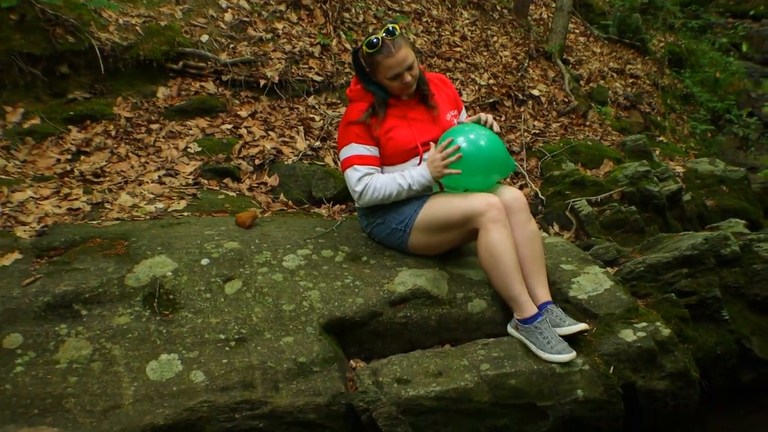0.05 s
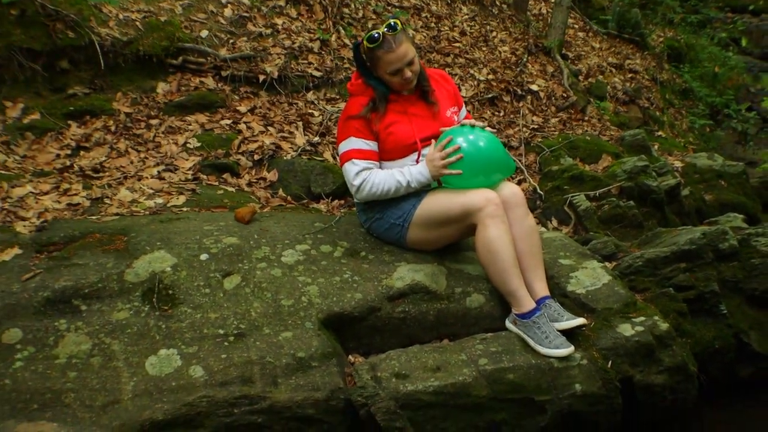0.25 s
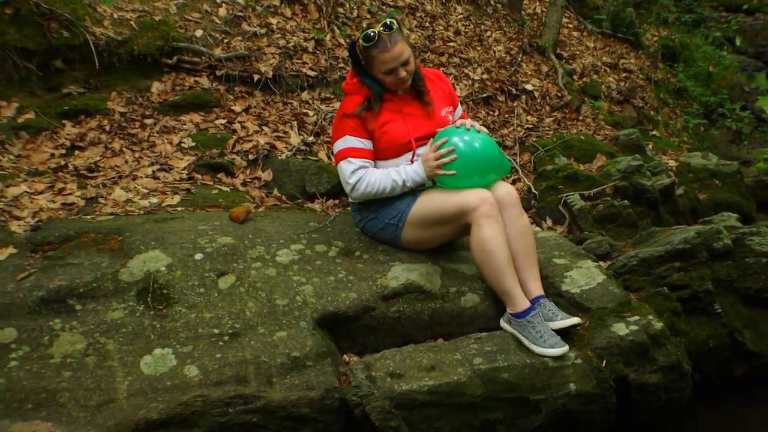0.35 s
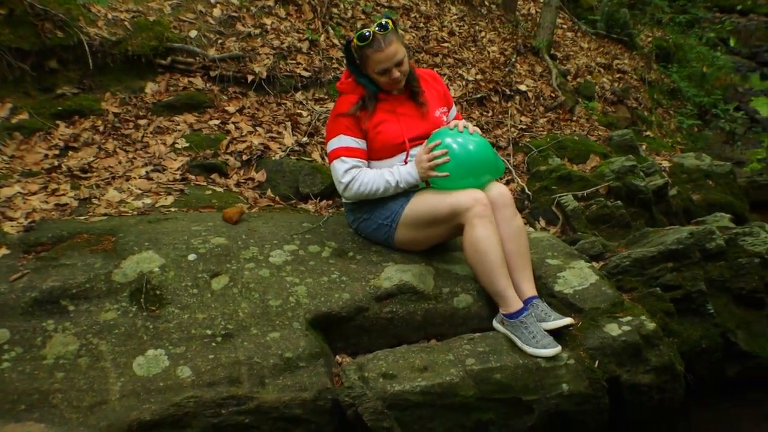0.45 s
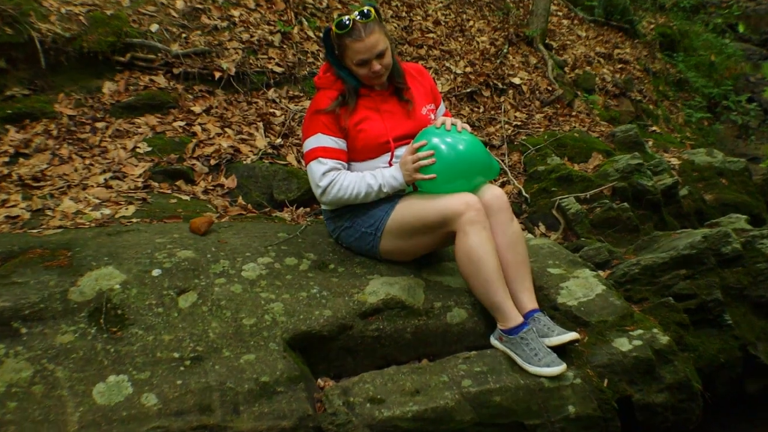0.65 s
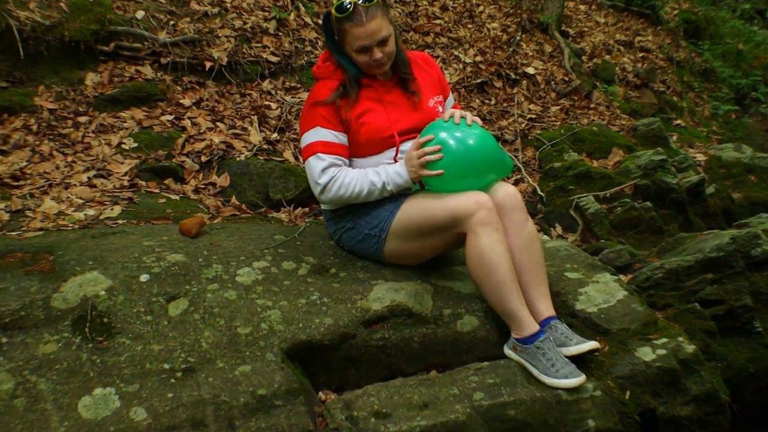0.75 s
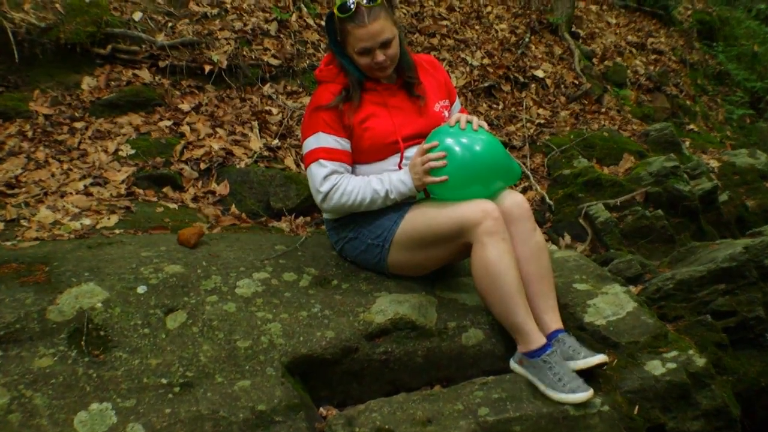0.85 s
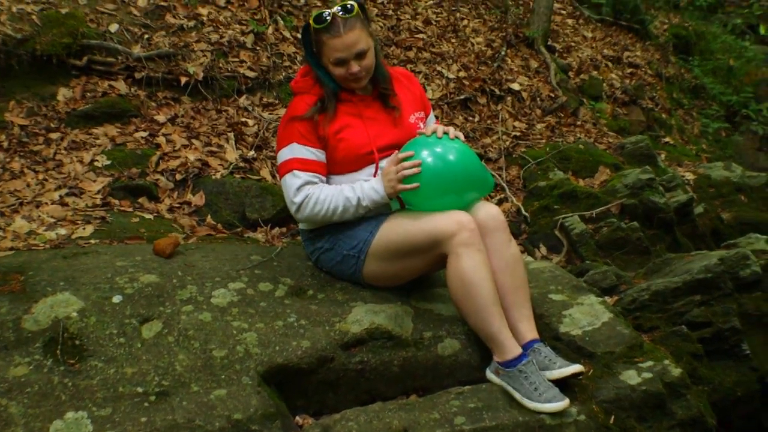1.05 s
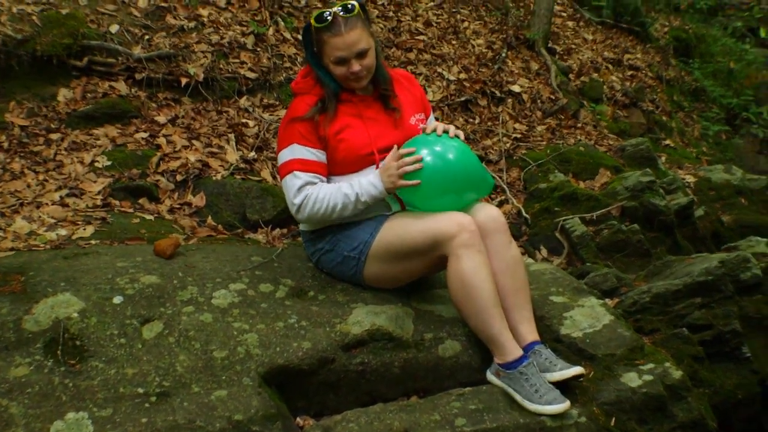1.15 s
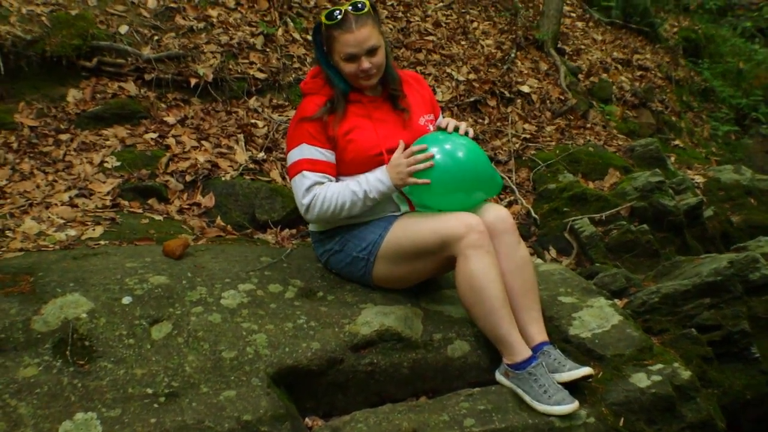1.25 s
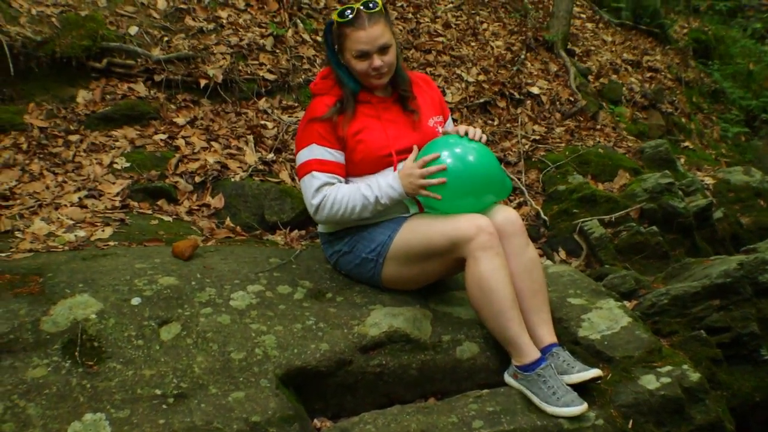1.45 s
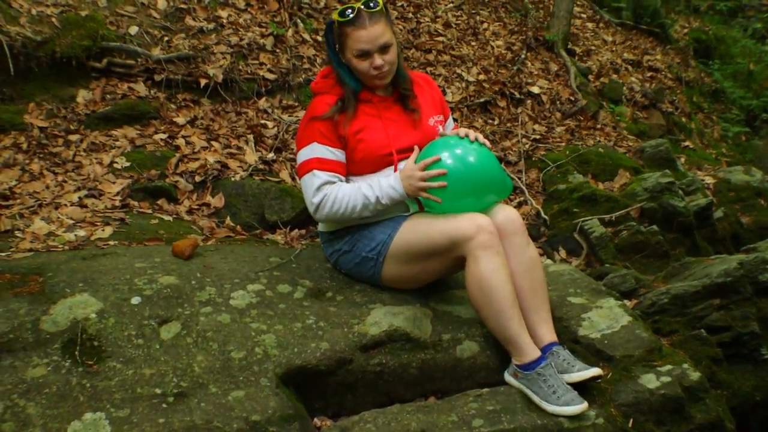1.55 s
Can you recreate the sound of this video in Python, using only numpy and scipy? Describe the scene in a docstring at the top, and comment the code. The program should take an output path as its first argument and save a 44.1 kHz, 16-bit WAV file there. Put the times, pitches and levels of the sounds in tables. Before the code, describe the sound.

Hands rub an inflated balloon, making short rubbery squeaks, creaks and crackles.

```python
"""Hands rub an inflated balloon in a quiet wood.
Fingertips stick and slip on the tight rubber: single slips crack, fast runs of slips become squeaks,
and light sliding hisses. All this rubbing rings in the balloon's skin and the air inside it.
Now and then a hand bumps the balloon. A low outdoor rumble and a faint hiss lie beneath."""
import sys
import numpy as np
from scipy import signal
from scipy.fft import rfft, irfft
from scipy.io import wavfile

SR = 44100
rng = np.random.default_rng(int(sys.argv[2]) if len(sys.argv) > 2 else 0)


def dump(signal):
    """Clip the signal to [-1, 1] and save it as 16-bit WAV at the path in sys.argv[1]."""
    limited = np.clip(np.atleast_2d(signal).T, -1, 1)
    pcm = np.round(limited * 32767).astype(np.int16)
    wavfile.write(sys.argv[1], SR, pcm)


N = 70560
TIME = np.arange(N) / SR
SIZE = 2 * N   # double length leaves room for ringing when filtering
HZ = np.maximum(np.arange(N + 1) * SR / SIZE, 1)


def from_db(db):
    """Turn decibels into a gain."""
    return 10 ** (np.asarray(db) / 20)


def unit_power(x):
    """Scale a signal to an average power of 1."""
    return x / np.sqrt(np.mean(x ** 2) + 1e-20)


def in_time(rows):
    """Join rows that start with a time into one curve for each other column."""
    seconds, *columns = np.transpose(rows)
    return [np.interp(TIME, seconds, column) for column in columns]


def at_hz(rows):
    """Join rows of frequency and value into a curve over all frequencies."""
    hz, value = np.transpose(rows)
    return np.interp(np.log(HZ), np.log(hz), value)


def pan(db):
    """Left and right gains, with the left louder by db."""
    return from_db(np.array([[1], [-1]]) * db / 2)


def tone_filter(rows):
    """A filter of power 1 with the given tone; it never rings before a sound starts (minimum phase)."""
    gain = unit_power(from_db(at_hz(rows)))
    cepstrum = irfft(np.log(gain))
    cepstrum[1:N] *= 2
    cepstrum[N + 1:] = 0
    return np.exp(rfft(cepstrum))


def through(x, response):
    """Pass a sound through a filter."""
    return irfft(rfft(x, SIZE) * response)[..., :N]


def drift(rate_hz):
    """A smooth random wobble, about 1 in size."""
    pole = np.exp(-2 * np.pi * rate_hz / SR)
    return unit_power(signal.lfilter([1], [1, -2 * pole, pole * pole], rng.standard_normal(SIZE))[N:])


def stereo(mid, side, alike):
    """Mix two unrelated signals into left and right; alike runs from 0 (unrelated) to 1 (the same)."""
    alike = np.clip(alike, -1, 1)
    return (np.sqrt(1 + alike) * mid + np.sqrt(1 - alike) * side * np.array([[1], [-1]])) / np.sqrt(2)


# How the rumble swells and fades. Each row: time in seconds, level in dB.
RUMBLE_LEVELS = [(0, -41), (0.3, -40), (0.6, -41.5), (0.7, -47.5), (0.85, -39.5), (1.0, -50.5), (1.2, -53),
                 (1.5, -50.5), (1.6, -43.5)]
# The tones of the rumble and the hiss. Each row: frequency in Hz, relative level in dB.
RUMBLE_TONE = [(20, -39), (40, -1.5), (60, 1), (140, 2), (220, -7.5), (400, -10), (1000, -28), (4000, -63)]
HISS_TONE = [(60, -12), (300, 0.5), (600, -0.5), (1000, 0), (3000, -3), (10000, -9), (13000, -30),
             (16000, -69)]

def woods(rumble_alike=.97, hiss_alike=0.2, hiss_db=-45):
    """The outdoors: a low rumble and a faint, even hiss."""
    rumble_db, = in_time(RUMBLE_LEVELS)
    rumble = through(stereo(*rng.standard_normal((2, N)), rumble_alike), tone_filter(RUMBLE_TONE))
    hiss = through(stereo(*rng.standard_normal((2, N)), hiss_alike), tone_filter(HISS_TONE))
    return from_db(rumble_db) * rumble + from_db(hiss_db) * hiss


# Soft bumps of the hand. Each row: start in seconds, pitch in Hz, level in dB, seconds to fade by 60 dB.
HAND_BUMPS = [(0.170, 427, -24.5, 0.014), (0.283, 69.6, -37, .14), (1.0012, 233, -9, 0.012),
              (1.003, 80, -22.5, 0.057), (1.097, 221.6, -20, 0.17)]

def bumps(low_cut_hz=55):
    """The whole balloon wobbles briefly when a hand nudges it."""
    wobbles = np.zeros(N)
    for start_s, hz, db, fade_s in HAND_BUMPS:
        age = np.maximum(TIME - start_s, 0)
        wobbles -= from_db(db - 60 * age / fade_s) * np.sin(2 * np.pi * hz * age)
    return signal.sosfilt(signal.butter(2, low_cut_hz, "high", fs=SR, output="sos"), wobbles)


# How alike the ringing is on the left and right. Each row: frequency in Hz, likeness from 0 to 1.
RING_LIKENESS = [(100, 0.91), (300, 0.52), (1000, 0.2), (2200, 0.19), (4000, 0.14), (8000, 0.3)]

def ringing(fade_s):
    """A stereo filter for a crowd of resonances that die away by 60 dB in fade_s seconds."""
    tail = rng.standard_normal((2, N)) * from_db(-60 * TIME / fade_s)
    mid, side = rfft(tail / np.sqrt(np.sum(tail ** 2, axis=1, keepdims=True)), SIZE)
    return stereo(mid, side, at_hz(RING_LIKENESS))


# How far the direct sound lags on the left. Each row: frequency in Hz, phase lag in radians.
DIRECT_LAG = [(200, 0.066), (1700, 0.16), (3000, 0.63), (4800, 1.79), (7000, 1.17), (12000, 1.12)]

def balloon_spot(skin_db=-3, skin_from_hz=700, air_db=-5, air_damp_hz=9700):
    """A filter for one spot on the balloon: direct sound, waves round the skin and ringing air."""
    skin_gain, air_gain = from_db(skin_db), from_db(air_db)
    skin = skin_gain * ringing(fade_s=.015) * (1j * HZ / (skin_from_hz + 1j * HZ))   # less bass
    air = air_gain * ringing(fade_s=.12) / (1 + 1j * HZ / air_damp_hz)   # less treble
    direct = np.exp(-1j * at_hz(DIRECT_LAG) * np.array([[1], [0]]))
    return (direct + skin + air) / np.sqrt(1 + skin_gain ** 2 + air_gain ** 2)


# The notes the balloon rings at. Each row: frequency in Hz, dB above the direct sound,
# seconds to fade by 60 dB.
RESONANCES = [(222.5, -2, 0.16), (297, 1.5, 0.074), (472.5, 0.5, 0.032), (571, -2.5, 0.064),
              (645, -4.5, 0.038), (727, -9, 0.064), (1153, -3, 0.013), (1760, -1.5, 0.031),
              (1950, -5, 0.093), (2416, 0.5, 0.017), (2660, -4, 0.032), (3490, -2, 0.021),
              (3790, -9, 0.024)]
# Which side is louder. Each row: frequency in Hz, dB by which the left is above the right.
SIDE_BALANCE = [(200, -1.5), (600, 0), (1300, -3), (2500, -.5), (4300, 5.5), (8000, 1), (12000, -0.5)]

def resonate(rubbing):
    """The balloon's main resonances colour every rub; the sound spreads unevenly to left and right."""
    peaks = sum(from_db(db) / (1 + 1j * (HZ - hz) * (2 * np.pi * fade_s / np.log(1000)))
                for hz, db, fade_s in RESONANCES)
    return through(rubbing, pan(at_hz(SIDE_BALANCE)) * (1 + peaks))


# Light sliding of the palm. Each row: time in seconds, level in dB.
SLIDE_LEVELS = [(0.0, -28), (0.03, -43.5), (0.08, -49.5), (0.155, -46.5), (0.2, -49), (0.265, -35.5),
                (0.32, -33), (0.385, -38.5), (0.41, -53), (0.46, -54), (0.478, -37), (0.505, -34.5),
                (0.52, -46.5), (0.58, -36), (0.62, -55), (0.70, -40.5), (0.76, -37.5), (0.805, -38.5),
                (0.87, -33.5), (0.925, -42), (1.05, -42.5), (1.12, -34.5), (1.3, -46), (1.395, -47),
                (1.47, -49), (1.53, -50), (1.555, -41), (1.578, -52), (1.6, -62)]
# Its tone. Each row: frequency in Hz, relative level in dB.
SLIDE_TONE = [(100, -14.5), (300, 5.5), (420, 1), (640, 8), (950, -2), (2000, -1.5), (3600, -0.5),
              (5500, -1.5), (6800, 3), (8500, -5), (10800, -3.5), (13000, -20), (16000, -57)]

def slide(grain_db=4.0, flutter_db=2, flutter_hz=110):
    """The palm skims the rubber in countless tiny catches, which blur into a hiss."""
    db, = in_time(SLIDE_LEVELS)
    catches = rng.standard_normal(N)
    catches *= from_db(grain_db * rng.standard_normal(N) + flutter_db * drift(flutter_hz))
    return through(unit_power(catches) * from_db(db), tone_filter(SLIDE_TONE) * balloon_spot())


def squeak(run, tone, jitter, jitter_hz, uneven_db, scrape_db, left_db, smear_s=0.001207):
    """A finger sticks and slips in a fast, unsteady run: each slip snaps, then scrapes a little."""
    rate, db = in_time(run)
    slip_count = np.cumsum(rate * np.exp(jitter * drift(jitter_hz))) / SR
    new_slip = np.diff(np.floor(slip_count), prepend=0)
    snaps = new_slip * np.sqrt(SR / rate) - np.sqrt(rate / SR)   # centred on zero
    scrape = from_db(scrape_db) * unit_power(rng.standard_normal(N) * np.exp(-(slip_count % 1)))
    force = unit_power((snaps + scrape) * from_db(uneven_db * drift(rate_hz=300)))
    touching = (TIME > run[0][0]) & (TIME < run[-1][0])
    smear = np.exp(-2j * np.pi * smear_s * HZ * (1 - HZ / SR))   # rubber spreads each snap, treble first
    response = tone_filter(tone) * smear * balloon_spot()
    return pan(left_db) * through(force * from_db(db) * touching, response)


# Five runs of slips. Each row: time in seconds, slips per second (the pitch), level in dB.
CHIRP_RUN = [(0.203, 480, -33), (0.212, 487, -26), (0.229, 623, -12.5), (0.238, 793, -17.5),
             (0.249, 785, -12), (0.259, 805, -21.5), (0.266, 800, -57), (0.280, 630, -61)]
CREAK_RUN = [(1.129, 195, -23), (1.135, 195, -17.5), (1.152, 206, -19), (1.168, 310, -21), (1.18, 380, -19),
             (1.195, 380, -36), (1.215, 490, -33)]
SQUEAL_RUN = [(1.185, 850, -22), (1.204, 890, -19.5), (1.222, 920, -18.5), (1.24, 940, -19.5),
              (1.26, 890, -23.5), (1.28, 880, -28)]
RASP_RUN = [(1.245, 830, -24), (1.27, 830, -23.5), (1.30, 810, -21), (1.325, 570, -23.5), (1.335, 600, -38)]
SCRATCH_RUN = [(1.334, 424, -43), (1.35, 430, -34.5), (1.368, 410, -30), (1.382, 540, -42),
               (1.40, 450, -52)]
# The tone of each run. Each row: frequency in Hz, relative level in dB.
CHIRP_TONE = [(200, -12.5), (480, -5.5), (790, 1), (1100, -11.5), (1750, -12), (2350, -6), (3700, -0.5),
              (4800, -2), (6400, 1.5), (8500, -11), (11000, -18), (13500, -39), (16000, -72)]
CREAK_TONE = [(120, -18), (220, -3.5), (400, -12), (630, -4), (1000, -11), (2000, -2.5), (2400, -3),
              (2900, -8), (3600, -2), (5000, 4.5), (6500, 3), (9000, -7), (11000, -16.5), (13000, -22),
              (16000, -45)]
SQUEAL_TONE = [(150, -18), (500, -14.5), (900, -8.5), (1300, -12), (1800, 1.5), (2200, -6), (2700, -3),
               (3300, -1.5), (4200, 0.5), (5300, 2), (7000, 0.5), (10500, -3), (13000, -43), (16000, -54)]
RASP_TONE = [(150, -21), (400, -10.5), (650, -4), (1000, -11.5), (1800, -2), (2100, -11), (2450, -1.5),
             (2900, -4), (3800, 6), (5000, 2), (8000, -1.5), (10500, -5), (13000, -37), (16000, -55)]
SCRATCH_TONE = [(150, -5), (650, -5), (1200, 3), (2000, -1), (4200, 7.5), (6500, -2), (10500, -6),
                (13000, -27), (16000, -45)]

def squeaks():
    """A short rising chirp; later a long rub creaks, squeals, breaks into a rasp and ends in a scratch."""
    chirp = squeak(CHIRP_RUN, CHIRP_TONE,
                   jitter=.04, jitter_hz=302, uneven_db=1.5, scrape_db=-6, left_db=-1)
    creak = squeak(CREAK_RUN, CREAK_TONE,
                   jitter=.03, jitter_hz=102.4, uneven_db=-1, scrape_db=-2.5, left_db=1)
    squeal = squeak(SQUEAL_RUN, SQUEAL_TONE,
                    jitter=.02, jitter_hz=196, uneven_db=0, scrape_db=2.5, left_db=0)
    rasp = squeak(RASP_RUN, RASP_TONE,
                  jitter=.12, jitter_hz=301.5, uneven_db=-1, scrape_db=1.5, left_db=0.5)
    scratch = squeak(SCRATCH_RUN, SCRATCH_TONE,
                     jitter=.15, jitter_hz=246, uneven_db=0, scrape_db=-2, left_db=-0.5)
    return chirp + creak + squeal + rasp + scratch


# Single slips of a finger. Each row: start in seconds, level in dB, bass boost in dB, treble boost in dB,
# frequency in Hz at which the patch of rubber under the finger rings.
FINGER_SLIPS = [(0.000, -31.5, -14, -1, 3370), (0.179, -42, 19, -9, 2330), (0.529, -30.5, 9, -7, 4770),
                (0.545, -27.5, 6, 2, 4640), (0.555, -32, 17, 4, 3600), (0.567, -26.5, 9, 2.5, 4340),
                (0.592, -23, 9.5, -0.5, 4700), (0.611, -50, 18.5, -12, 650), (0.635, -23.5, 5, -21, 1220),
                (0.643, -31, 5, -15, 1210), (0.655, -26.5, 0, 3.5, 6000), (0.6755, -12.5, -13, 2, 5340),
                (0.7285, -21, 1, -2.5, 1170), (0.742, -29.5, 8, -1, 1200), (0.7775, -19.5, -3.5, 8.5, 1180),
                (0.781, -23, 7, 5.5, 5200), (0.792, -27.5, -2, 13.5, 2540), (0.822, -32.5, -5, 8, 1210),
                (0.8425, -15.5, -1.5, 0, 1210), (0.8755, -12.5, -7.5, -8, 1080), (0.911, -41, 3, -7, 1150),
                (0.942, -27.5, -1, -15, 2450), (0.9645, -19, -5, 9, 2470), (0.9685, -8, 0.5, -1.5, 3550),
                (0.9865, -19.5, 10, 11.5, 1260), (0.990, -34.5, 10.5, -7, 624), (1.000, -27, 7, 10, 524),
                (1.0688, -18, 3.5, -16, 1750), (1.0795, -20.5, 0, -7, 1090), (1.0885, -12, 6, -0.5, 3370),
                (1.0978, -11.5, -7, -7, 1050), (1.1075, -14.5, -7, -18, 1850), (1.111, -12, -24, -5, 4800),
                (1.132, -18.5, -1, -22, 2390), (1.437, -28, 1.5, -8, 2380), (1.551, -27.5, -4, -21, 2000),
                (1.571, -27.5, -23, -9.5, 4150)]
# The tone they share. Each row: frequency in Hz, relative level in dB.
SLIP_TONE = [(30, -27), (150, -6), (240, 2.5), (380, -3), (620, 5), (900, -7.5), (1250, -2.5), (2000, -3.5),
             (3400, -0.5), (6000, -3.5), (10500, -7.5), (13000, -21), (16000, -47)]
SLIP_ATTACK_S, SLIP_LENGTH_S, SLIP_END_STEEPNESS = .0007, .0048, 1.58
PATCH_DB, PATCH_Q = 0.5, 5.3   # strength and sharpness of the patch's ringing

def slips(snap_db=12, grain_db=3, bass_hz=745, treble_hz=5100, finger_count=4):
    """Each slip lets go with a snap and skids for a few milliseconds in tiny jerks; fingers take turns."""
    fingers = np.zeros((finger_count, SIZE))
    length = 2048
    age = np.arange(length) / SR
    rise = 1 - np.exp(-age / SLIP_ATTACK_S)
    fall = np.exp(-(age / SLIP_LENGTH_S) ** SLIP_END_STEEPNESS)
    low_pass = signal.butter(1, bass_hz, fs=SR)
    high_pass = signal.butter(1, treble_hz, "high", fs=SR)
    for k, (start_s, db, bass_db, treble_db, patch_hz) in enumerate(FINGER_SLIPS):
        jerks = rng.standard_normal(length) * from_db(grain_db * rng.standard_normal(length))
        jerks *= rise * fall
        jerks *= np.sqrt(SLIP_LENGTH_S * SR / 2 / np.sum(jerks ** 2))   # same energy for every skid
        jerks[int(SLIP_ATTACK_S * SR)] += from_db(snap_db)
        bass = (from_db(bass_db) - 1) * signal.lfilter(*low_pass, jerks)
        treble = (from_db(treble_db) - 1) * signal.lfilter(*high_pass, jerks)
        slip = jerks + bass + treble
        patch = from_db(PATCH_DB) * signal.lfilter(*signal.iirpeak(patch_hz, PATCH_Q, fs=SR), slip)
        start = int(start_s * SR)
        fingers[k % finger_count, start:start + length] += from_db(db) * (slip + patch)
    tone = tone_filter(SLIP_TONE)
    return sum(through(finger, tone * balloon_spot()) for finger in fingers)


def scene():
    """The rubbing rings through the balloon, over the bumps and the quiet wood."""
    rubbing = squeaks() + slips() + slide()
    return resonate(rubbing) + bumps() + woods()


def record(dry, ceiling=1.2, cutoff_hz=17000):
    """Round off the loudest peaks and cut the highest treble."""
    rounded = ceiling * np.tanh(dry / ceiling)
    return signal.sosfilt(signal.cheby2(12, 70, cutoff_hz, fs=SR, output="sos"), rounded)


dry = scene()
out = record(dry)
dump(out)
```